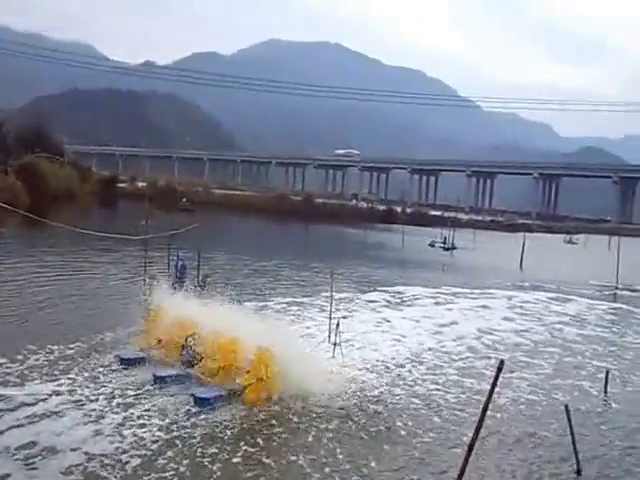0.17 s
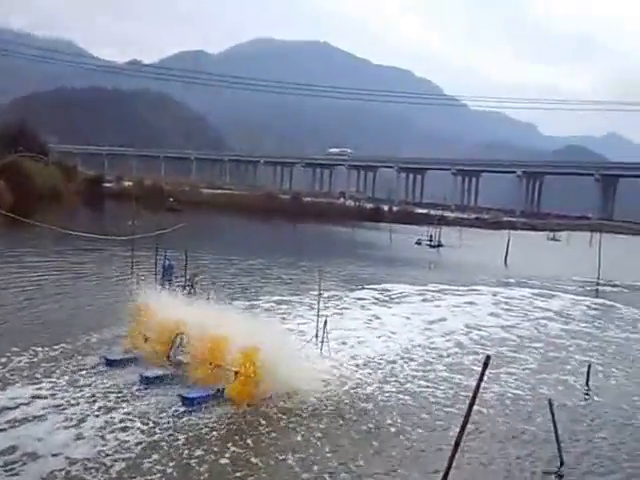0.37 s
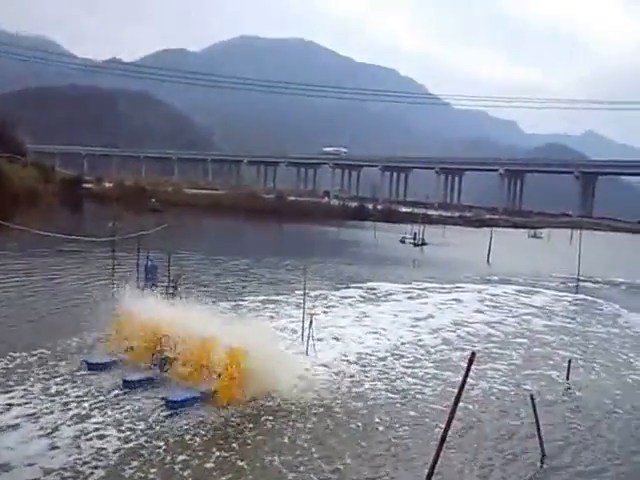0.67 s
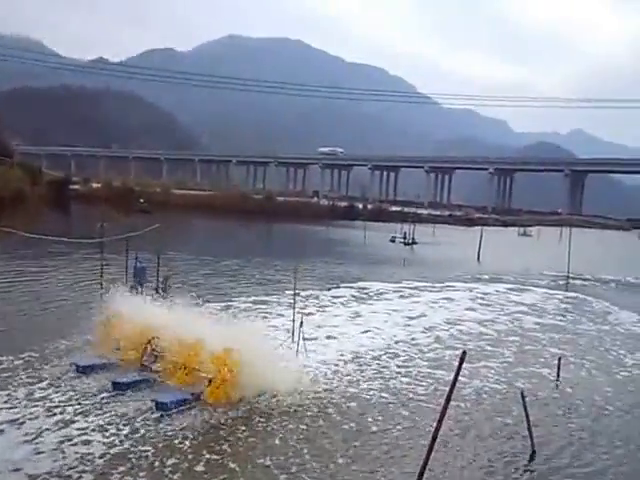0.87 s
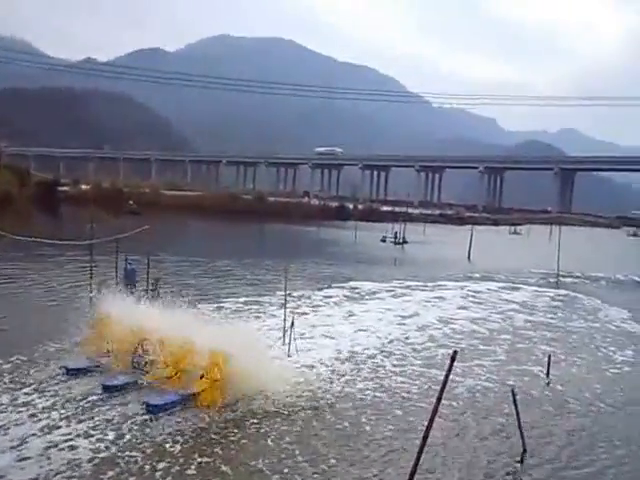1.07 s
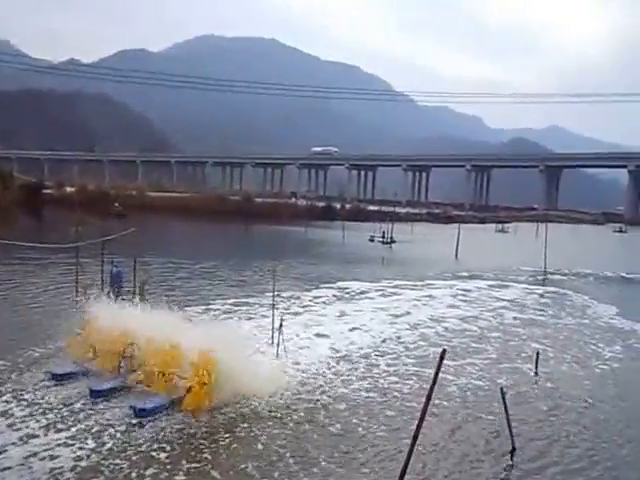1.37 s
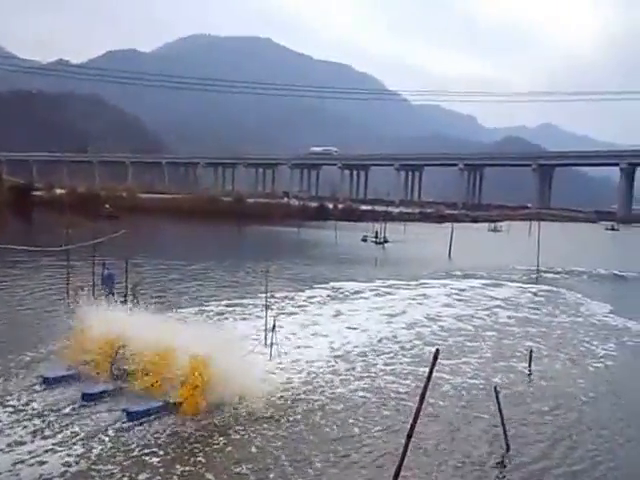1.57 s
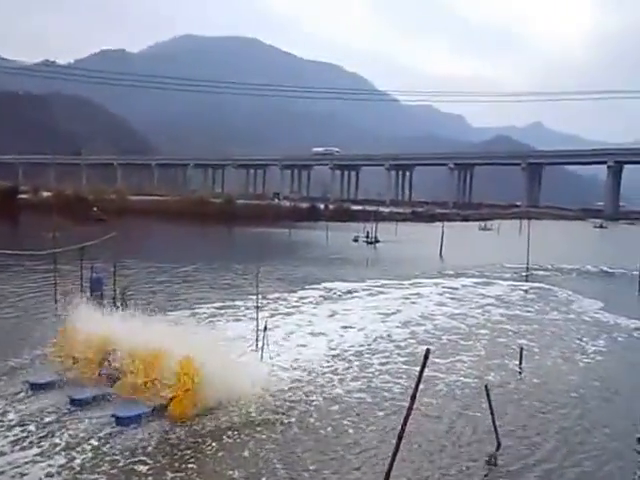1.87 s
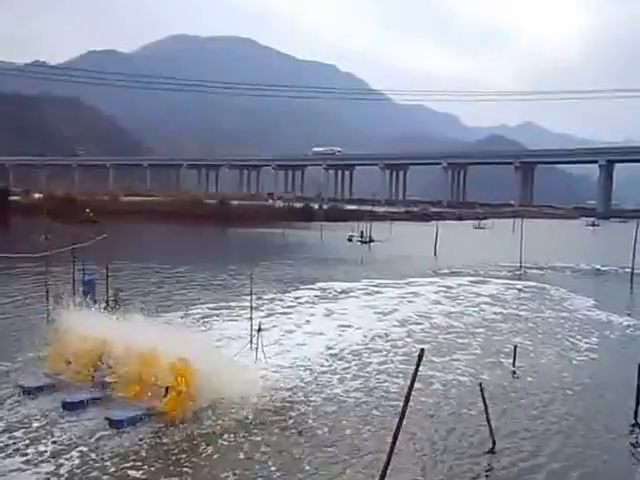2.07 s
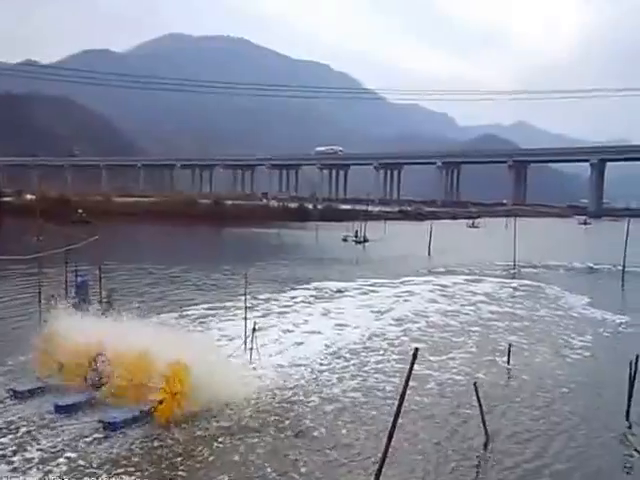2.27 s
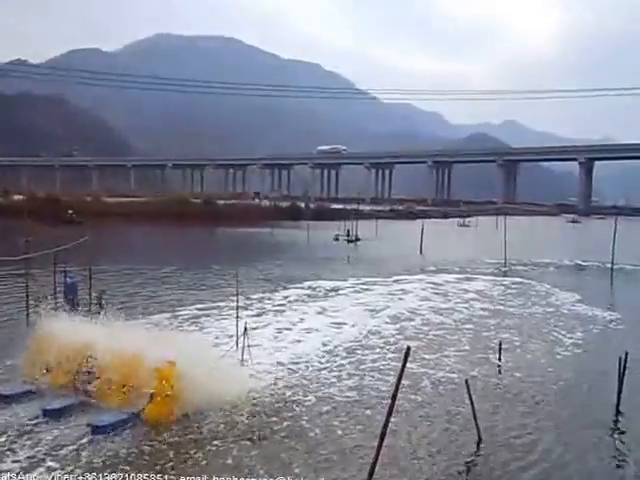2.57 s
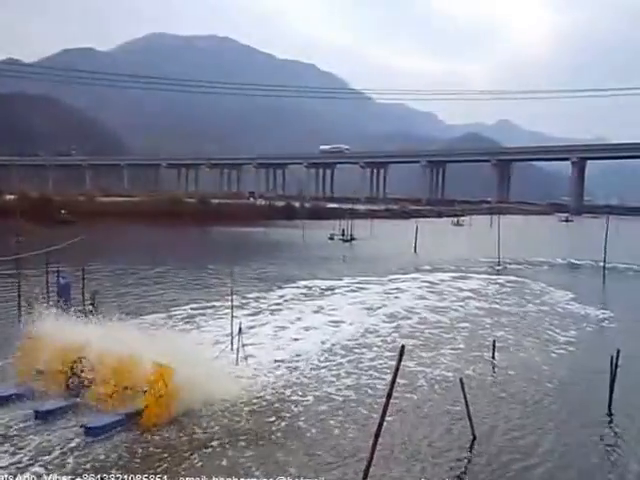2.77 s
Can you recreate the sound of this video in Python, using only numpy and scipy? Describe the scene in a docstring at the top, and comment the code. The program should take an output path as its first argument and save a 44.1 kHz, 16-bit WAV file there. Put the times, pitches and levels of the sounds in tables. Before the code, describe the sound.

Outdoors on an open pond, continuous frothy spray from a motor-driven paddle wheel grows fuller after about 1.4 seconds, under lumpy low wind buffets that hit the right side of the unprotected stereo microphone much harder.

```python
"""Pond aerator in the wind

A paddle wheel churns a pond some way off: a wash of spray and drops is filtered noise with short rings,
gurgles are gliding tones, and the gear drive hums in a set of wavering sines.
Wind buffets the two microphone ports as lumpy low noise, the right one far harder, and fills the bass.
The right port also rings in the treble, a resonance whose pitch slides."""
import sys
import numpy as np
from scipy import signal
from scipy.fft import rfft, irfft
from scipy.io import wavfile
from scipy.ndimage import uniform_filter1d

SR = 44100
rng = np.random.default_rng(int(sys.argv[2]) if len(sys.argv) > 2 else 0)


def wav_record(signal):
    """Record a signal, one row per channel, as 16-bit PCM in the file named by sys.argv[1]."""
    frames = np.transpose(np.atleast_2d(signal))
    bounded = np.clip(frames, -1, 1)
    # unit amplitude maps onto the largest positive 16-bit level
    quanta = np.round(bounded * 32767).astype(np.int16)
    wavfile.write(sys.argv[1], SR, quanta)


N = 129213  # length in samples

LEFT_DULL_HZ = 300  # wind on the left port fades above this


def from_db(db):
    """Turn decibels into a plain factor."""
    return 10 ** (np.asarray(db) / 20)


def rms_one(x):
    """Scale a signal to an rms of 1."""
    return x / np.sqrt(np.mean(x ** 2) + 1e-20)


def in_time(rows):
    """Draw straight lines between the rows of a time table: one curve for each column."""
    s, *columns = np.transpose(rows)
    return [np.interp(np.arange(N) / SR, s, column) for column in columns]


def at_hz(rows):
    """Read the columns of a frequency table at every FFT bin, along a log frequency scale."""
    hz, *columns = np.transpose(rows)
    log_bins = np.log(np.fft.rfftfreq(N, 1 / SR) + 1)
    return [np.interp(log_bins, np.log(hz), column) for column in columns]


def drift(rate):
    """Random wandering with an rms of 1: noise smoothed to about `rate` Hz, made at every 40th sample."""
    r = np.exp(-80 * np.pi * rate / SR)
    noise = rng.standard_normal(N // 40 + 2002)
    slow = signal.lfilter([1], [1, -2 * r, r * r], noise)[2000:]  # skip the filter's start-up
    return np.interp(np.arange(N) / 40, np.arange(len(slow)), rms_one(slow))


def ring(clicks, hz, t60):
    """A unit click sets off a sine of height 1 that dies by 60 dB in t60 seconds."""
    r = from_db(-60 / (t60 * SR))
    w = 2 * np.pi * hz / SR
    return signal.lfilter([0, np.sin(w)], [1, -2 * r * np.cos(w), r * r], clicks + 1e-18)


def pair(shared, own, alike, lead):
    """Left and right spectra: the left port shares part of what the right one gets."""
    alike = np.clip(alike, 0, 1)
    left = alike * np.exp(1j * lead) * shared + np.sqrt(1 - alike ** 2) * own
    return np.array([left, shared])


def eddies(spectrum, lump_db, lumps):
    """Lumpy pressure noise of passing eddies at both ports, duller on the left; right rms is 1."""
    # how alike the wind is at the ports: f/Hz, likeness (0 to 1), left leads/rad
    wind_likeness = [(15, .96, -.4), (40, .93, -.65), (100, .75, -.85), (250, .58, -.7), (600, .6, -.3)]
    hz = np.fft.rfftfreq(N, 1 / SR)
    lumpy = rng.standard_normal((2, N)) * from_db(lump_db * lumps)
    both = pair(*rfft(lumpy), *at_hz(wind_likeness))
    both[0] /= np.sqrt(1 + (hz / LEFT_DULL_HZ) ** 2)
    colour = from_db(at_hz(spectrum)[0]) * (hz > 0)  # no steady pressure
    air = irfft(both * colour, N)
    return air / np.std(air[1])


def buffets():
    """Each hard buffet is a short swell of rough air, a dull body and an edge; later and duller on the left."""
    # the hardest buffets: t/s, body level/dB, left re right/dB, edge re body/dB (levels before filtering)
    hard_hits = [(0.006, -18, -23, -8.5), (0.021, -22, -18, -12), (0.048, -17, -17, -6.5),
                 (0.067, -17, -17, -12), (0.09, -30, -17, -8.5), (0.16, -23, -24, -12.5),
                 (0.307, -22, -24, -18), (0.384, -24.5, -16, -9), (0.588, -21.5, -18, -7),
                 (0.602, -15.5, -19, -13), (0.63, -23, -20, -18), (0.673, -22, -15, -14),
                 (0.722, -25.5, -19, -12), (0.752, -19.5, -18, -12), (0.775, -36, -23, -16),
                 (0.801, -19.5, -20, -10.5), (0.844, -26.5, -16, -16), (0.891, -15, -26, -19),
                 (1.189, -25, -17, -7.5), (1.621, -27.5, -15, -20), (1.685, -18, -14, -14),
                 (1.778, -24, -3, -8), (1.833, -19, -17, -22), (1.867, -11, -23, -16.5),
                 (1.924, -31, -6, -11), (2.012, -15, -16, -10.5), (2.085, -12.5, -23, -18),
                 (2.112, -22, -21, -10.5), (2.143, -28, -20, -23), (2.203, -26, -18, -7),
                 (2.306, -28, -10, -12), (2.737, -19.5, -13, -13), (2.774, -23, -16, -24),
                 (2.836, -21, -17, -18)]
    low_hz, edge_hz, top_hz = 91, 259, 783  # body between the first two, edge between the last two
    swell_s = 0.025
    lead = int(0.0072 * SR)  # the swell starts this many samples before the tabled time
    lag_s = 0.0021  # a buffet reaches the left port later
    s, db, side_db, edge_db = np.transpose(hard_hits)
    jumps = 0
    for from_hz, to_hz, part_db in [(low_hz, edge_hz, db), (edge_hz, top_hz, db + edge_db)]:
        clicks = np.zeros((2, N))
        clicks[0, ((s + lag_s) * SR).astype(int)] = from_db(part_db + side_db)
        clicks[1, (s * SR).astype(int)] = from_db(part_db)
        swell = signal.fftconvolve(clicks, [np.hanning(int(swell_s * SR))])
        swell = swell[:, lead:][:, :N]
        air = signal.lfilter(*signal.butter(1, 1.7 * from_hz, fs=SR), rng.standard_normal(N))
        band = signal.butter(2, [from_hz, to_hz], "band", fs=SR, output="sos")
        air = signal.sosfilt(band, air)
        air = air / np.sqrt(uniform_filter1d(air ** 2, size=700))  # even out its strength
        jumps = jumps + swell * [np.roll(air, int(lag_s * SR)), air]
    jumps = signal.sosfilt(signal.butter(4, top_hz, fs=SR, output="sos"), jumps)
    jumps[0] = signal.lfilter(*signal.butter(1, LEFT_DULL_HZ, fs=SR), jumps[0])
    return jumps


def wind():
    """Wind presses on the ports: deep rumble and higher flutter share their lumps; hard buffets come on top."""
    # strength of the wind before the gain below: t/s, rumble level/dB, flutter level/dB, left re right/dB
    wind_course = [(0.0, -16, -27, -18), (0.02, -19, -32.5, -7.5), (0.08, -15, -33, -10.5),
                   (0.11, -25, -35, -6), (0.2, -22, -35.5, -15), (0.23, -36, -35, -15),
                   (0.26, -24, -40.5, -12), (0.42, -24, -34, -13), (0.57, -24.5, -40, -12),
                   (0.61, -13.5, -24, -13), (0.64, -30, -35, -8), (0.68, -15, -31.5, -12.5),
                   (0.74, -20.5, -32, -12), (0.79, -11.5, -32, -12.5), (0.87, -29, -35.5, -16),
                   (0.92, -21.5, -45, -9.5), (1.03, -29, -35.5, -11), (1.09, -24.5, -44, -10),
                   (1.17, -32, -41.5, -9.5), (1.21, -23, -44, -9), (1.26, -31, -38, -7.5),
                   (1.39, -36.5, -46, -4), (1.43, -18, -49, -11), (1.49, -38, -34.5, -5),
                   (1.53, -20.5, -33.5, -15), (1.57, -27, -29.5, -14), (1.61, -15.5, -30.5, -10),
                   (1.65, -17.5, -32.5, -12), (1.68, -14.5, -36, -8), (1.72, -29, -51, -11),
                   (1.79, -16.5, -30, -6), (1.84, -21, -44, -8), (1.86, -16.5, -35, -12),
                   (2.0, -18.5, -31, -7.5), (2.15, -22, -33, -10.5), (2.18, -26.5, -40, -12),
                   (2.21, -16.5, -37.5, -9), (2.36, -23.5, -35, -9.5), (2.4, -23.5, -36, -10),
                   (2.6, -22.5, -42.5, -14.5), (2.64, -34.5, -32.5, -2.5), (2.71, -18, -38.5, -18),
                   (2.83, -25, -36, -8), (2.93, -17.5, -32.5, -12)]
    # colour of the deep part: f/Hz, level per Hz/dB
    rumble_colour = [(8, -15.5), (15, 9), (40, 1), (70, -1), (110, -8.5), (160, -16), (300, -66.5)]
    # colour of the higher part: f/Hz, level per Hz/dB
    flutter_colour = [(60, 4.5), (110, -4.5), (200, 3.5), (330, -4.5), (500, -16), (800, -32.5),
                      (1500, -47), (3000, -66)]
    gain_db = 8  # lifts rumble and flutter at both ports
    rumble_db, flutter_db, pan_db = in_time(wind_course)
    lumps = drift(16)  # Hz
    rumble = from_db(rumble_db) * eddies(rumble_colour, 0.5, lumps)  # lumps of 0.5 dB
    flutter = from_db(flutter_db) * eddies(flutter_colour, 3, lumps)  # lumps of 3 dB
    sides = from_db([pan_db, 0 * pan_db])
    return from_db(gain_db) * (rumble + flutter) * sides + buffets()


def hum():
    """Tooth-mesh tones of the gearbox and their side tones, wavering on the way over the water."""
    # pitch of each tone: f/Hz
    tone_pitches = [123.3, 246.5, 357.8, 370, 493.3, 606, 617, 846]
    # a row for each tone, before the doubling below: level/dB, left re right/dB
    tone_levels = [(13, -9), (6, -9), (2, -8), (3, -8), (-8, -12), (-8, -8), (-11, -8), (-17, -4)]
    waver_db, waver_hz = 3, 6.4
    bend_rad, bend_hz = 0.39, 5.2  # phase wander of a 370 Hz tone, more for higher tones
    t = np.arange(N) / SR
    tones = 0
    for hz, (db, pan_db) in zip(tone_pitches, tone_levels):
        level = from_db(db + waver_db * drift(waver_hz)) * from_db([[pan_db], [0]])
        bend = bend_rad * hz / 370 * drift(bend_hz)
        tones = tones + level * np.sin(2 * np.pi * (hz * t + rng.random()) + bend) * 2
    return tones


def gurgles():
    """Big pockets of air gurgle under the paddles: each a soft tone that climbs a little and wobbles."""
    # the pockets, levels before the doubling below: t/s, f/Hz, level/dB
    air_pockets = [(1.085, 610, -42.5), (1.185, 606, -42.5), (1.345, 589, -44), (1.41, 627, -50),
                   (1.555, 650, -47), (1.672, 679, -41.5), (1.69, 805, -43.5), (1.725, 610, -40.5),
                   (1.825, 608, -36), (1.925, 625, -40), (1.955, 617, -42), (2.605, 673, -44),
                   (2.82, 545, -43)]
    length_s, rise = 0.042, 0.054  # rise: share by which the pitch climbs
    left_db = -12.5  # left re right
    tones = np.zeros(N)
    wobble = from_db(1.35 * drift(54))
    for s, hz, db in air_pockets:
        age = np.clip((np.arange(N) / SR - s) / length_s, 0, 1)  # 0 to 1 over the gurgle
        turns = hz * length_s * (age + rise * (age ** 2 - age) / 2) + rng.random()
        tones += from_db(db) * np.sin(np.pi * age) * np.sin(2 * np.pi * turns) * 2
    return tones * wobble * from_db([[left_db], [0]])


def water():
    """Source of the wash: hiss plus drops that each ring a few cycles, at pitches over five octaves."""
    drops_per_s, cycles, spread_db = 4000, 5, 2.5
    drop_share = 0.17  # share of the power
    sizes = from_db(spread_db * np.minimum(rng.exponential(1, N), 6)) * rng.choice([-1, 1], N)
    born = rng.random(N) < drops_per_s / SR
    pitch_number = rng.integers(0, 20, N)
    drops = 0
    for k, hz in enumerate(np.geomspace(400, 13000, 20)):
        clicks = sizes * born * (pitch_number == k)
        # the weight makes high drops louder
        drops = drops + np.sqrt(hz) * hz * ring(clicks, hz, cycles / hz) / 1000
    return np.sqrt(drop_share) * rms_one(drops) + np.sqrt(1 - drop_share) * rng.standard_normal(N)


def slaps(octave):
    """Heavier throws of water swell one band, in dB: quick rise, short fall."""
    # the throws: t/s, swell/dB, centre f/Hz, width/octaves
    heavy_throws = [(1.10, 3, 1490, 0.92), (1.171, 6.5, 1760, 1.3), (1.295, 6, 1900, 0.86),
                    (1.575, 6, 7000, 1.5)]
    rise_s = 0.0059
    swell_db = 0
    for s, db, hz, width in heavy_throws:
        age = np.clip((np.arange(N) / SR - s) / rise_s, 0, 50)
        nearness = np.exp(-((octave - np.log2(hz)) / width) ** 2)
        swell_db = swell_db + db * nearness * age * np.exp(1 - age)
    return swell_db


def port(x, centre_hz):
    """The port's cavity adds a resonance whose pitch slides as the microphone turns."""
    width_hz, gain_db = 2000, -0.5  # gain before the doubling below
    r = np.exp(-np.pi * width_hz / SR)
    b = [(1 - r * r) / 2, 0, (r * r - 1) / 2]
    ringing, state = np.zeros(N), np.zeros(2)
    for i in range(0, N, 512):  # retune every 512 samples
        a = [1, -2 * r * np.cos(2 * np.pi * centre_hz[i] / SR), r * r]
        ringing[i:i + 512], state = signal.lfilter(b, a, x[i:i + 512], zi=state)
    return x + from_db(gain_db) * 2 * ringing


def wash(port_hz, treble_db):
    """Spray in half-octave bands, each flickering alone and all swelling together at random, plus slaps."""
    # colour of the spray: f/Hz, left level per Hz/dB, right level per Hz/dB
    spray_colour = [(200, -4, 7), (330, -3.5, 18.5), (427, -6, 10), (605, 9.5, 14.5), (770, 9, 14),
                    (830, 7, 11.5), (943, 0, 6), (1420, 5, 8.5), (1745, -2.5, 2.5), (1970, 2.5, 4.5),
                    (2330, -6, 0), (2450, 0, 0.8), (3980, -2.5, -2.5), (4900, -1.5, -1.4), (5740, -7, -1.6),
                    (7000, -7, -3), (9200, -9, -4), (10400, -7.5, -6), (11760, -7, -10), (13250, -5.5, -19),
                    (14900, -22, -7)]
    # how the ports agree on the spray: f/Hz, likeness (0 to 1), left leads/rad
    spray_likeness = [(600, .8, .3), (1400, .8, .2), (2500, .8, 0), (2900, .94, 0), (3600, .93, 0),
                      (4200, .75, -.4), (5700, .5, -1.4), (7000, .45, -.6), (9000, .45, -.2),
                      (10000, .45, 1.3), (12000, .45, .3), (14000, .45, 0)]
    treble_from_hz = 2900  # the treble tilt grows over one octave from here
    both = pair(rfft(water()), rfft(water()), *at_hz(spray_likeness)) * from_db(at_hz(spray_colour))
    octave = np.log2(np.fft.rfftfreq(N, 1 / SR) + 1)
    shared_flicker_db = 0.35 * drift(13)  # all bands together
    spray = 0
    for centre in np.arange(7.5, 14.5, .5):
        band = np.cos(np.pi * np.clip(octave - centre, -.5, .5)) ** 2
        tilt_db = (treble_db - treble_db.mean()) * np.clip(centre - np.log2(treble_from_hz), 0, 1)
        flicker_db = shared_flicker_db + 0.8 * drift(28)  # the second part is this band's alone
        spray = spray + irfft(both * band, N) * from_db(flicker_db + tilt_db + slaps(centre))
    spray = spray / np.std(spray[0])  # left spread is 1
    spray[1] = port(spray[1], port_hz)
    return spray


def scene():
    """Wind at the ports over the distant machine."""
    # the aerator as it reaches the microphone, level before the gains below:
    # t/s, level/dB, right port's ring f/Hz, treble/dB (only its change about the mean counts), hum swell/dB
    aerator_course = [(0.1, -57, 10500, -8.5, 1.5), (0.22, -60, 10400, -8, 2.5),
                      (0.66, -53, 8700, -9, -2.5), (0.97, -57.5, 8750, -8, -2),
                      (1.3, -53, 9200, -8.5, -3.5), (1.42, -47.5, 8870, -8, -1.5),
                      (1.5, -46, 8600, -9.5, -3), (1.58, -44.5, 8550, -9.5, 2), (1.66, -45, 8260, -9.5, -1),
                      (1.8, -45, 8300, -10, -3), (1.98, -48, 8350, -8, 1.5), (2.17, -50, 8400, -9.5, -6),
                      (2.38, -50, 8200, -8.5, -3), (2.62, -48.5, 8050, -10, 4), (2.76, -47, 7900, -8.5, 0),
                      (2.88, -45.5, 7950, -10.5, -0.1)]
    wash_db, hum_gain_db = 5.5, 0.9
    level_db, port_hz, treble_db, hum_db = in_time(aerator_course)
    spray = from_db(wash_db) * wash(port_hz, treble_db)
    drive = from_db(hum_db + hum_gain_db) * hum()
    return wind() + gurgles() + from_db(level_db) * (spray + drive)


def record(dry):
    """Peaks are rounded softly, then the top is cut steeply."""
    rounded = 1.3 * np.tanh(dry / 1.3)
    top_cut = signal.ellip(12, .5, 85, 14150, fs=SR, output="sos")  # cutoff 14150 Hz
    return signal.sosfilt(top_cut, rounded)


dry = scene()
out = record(dry)
wav_record(out)
```